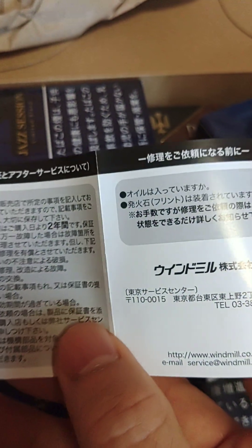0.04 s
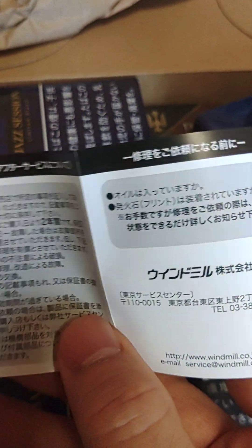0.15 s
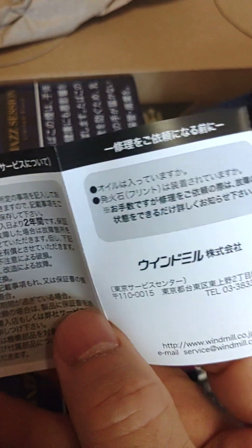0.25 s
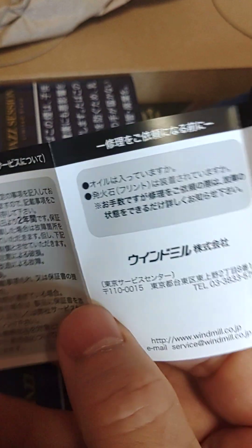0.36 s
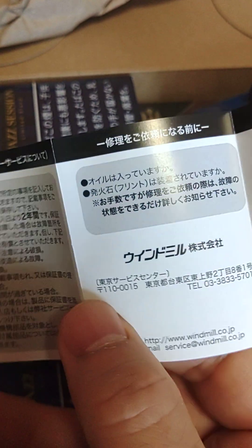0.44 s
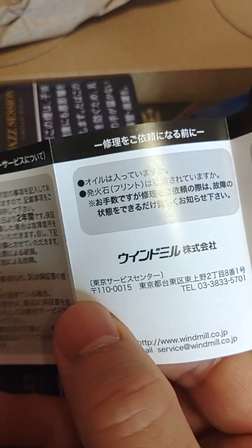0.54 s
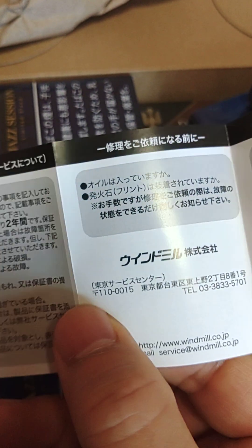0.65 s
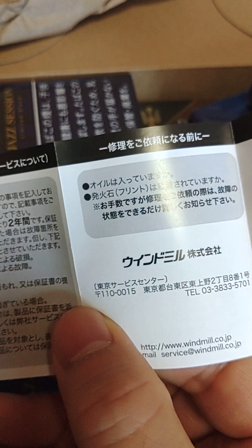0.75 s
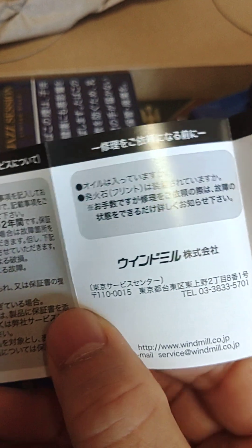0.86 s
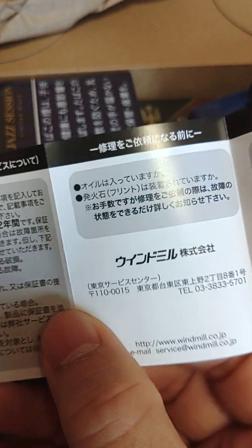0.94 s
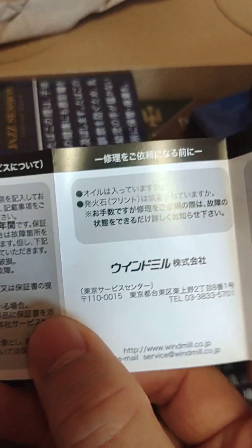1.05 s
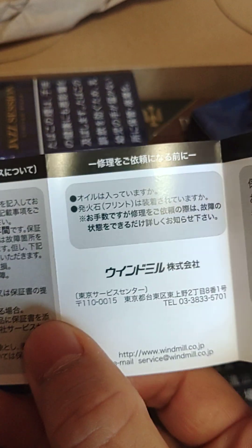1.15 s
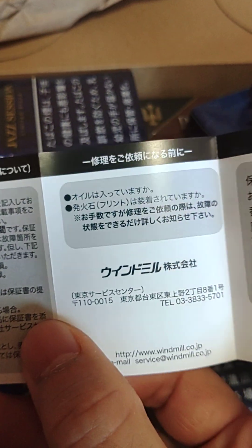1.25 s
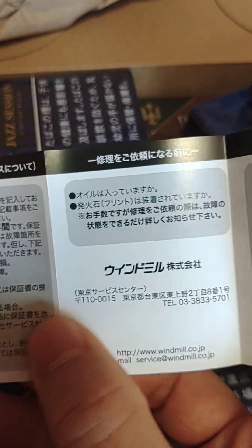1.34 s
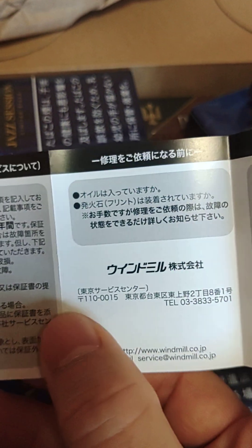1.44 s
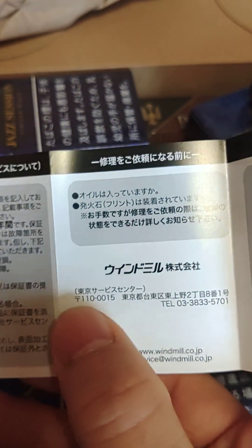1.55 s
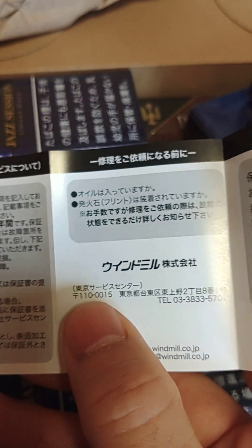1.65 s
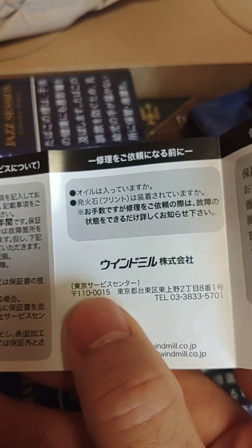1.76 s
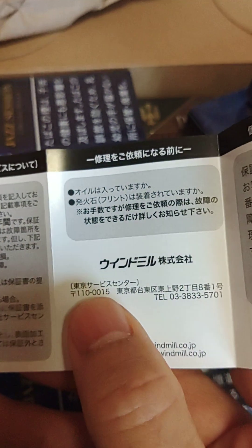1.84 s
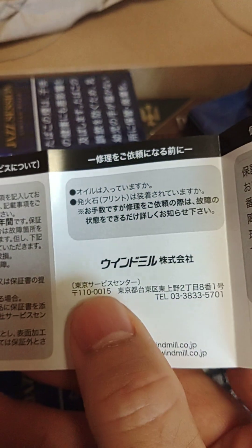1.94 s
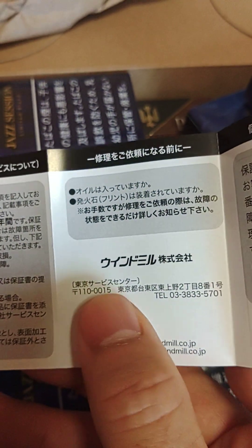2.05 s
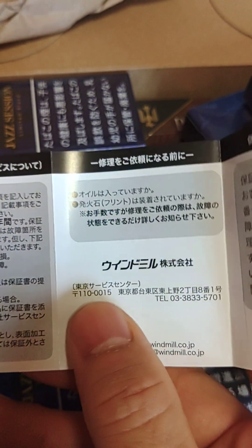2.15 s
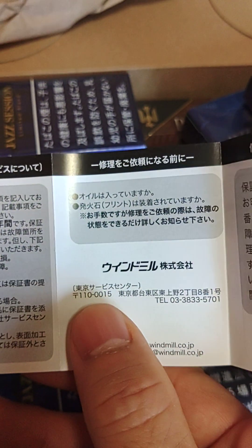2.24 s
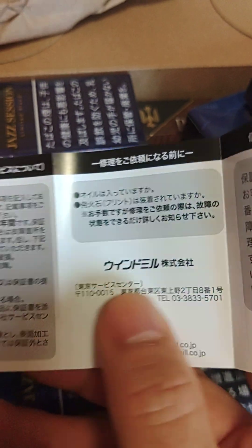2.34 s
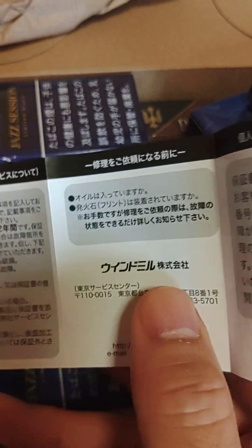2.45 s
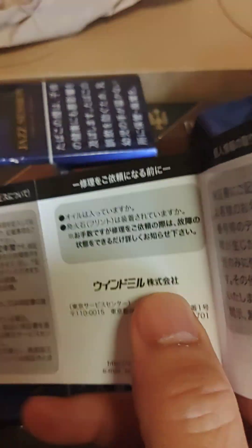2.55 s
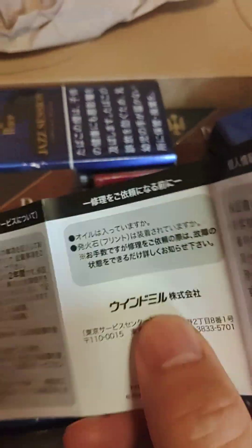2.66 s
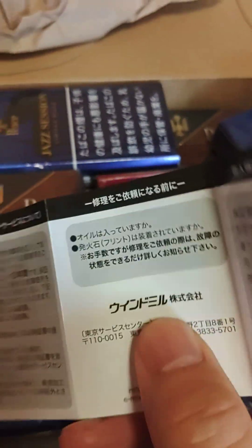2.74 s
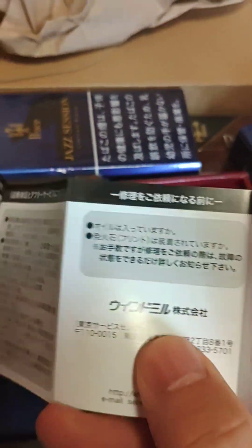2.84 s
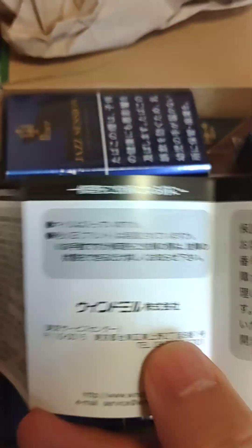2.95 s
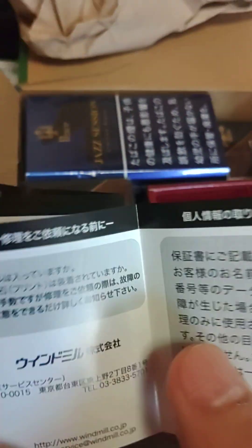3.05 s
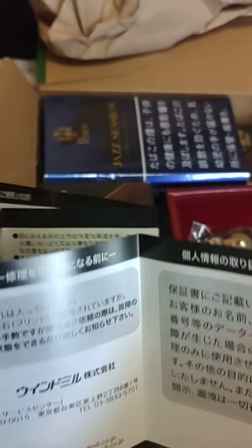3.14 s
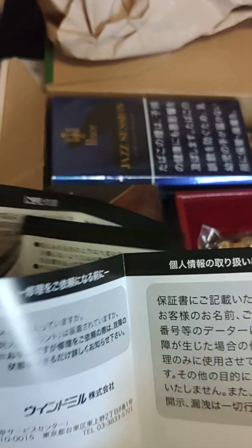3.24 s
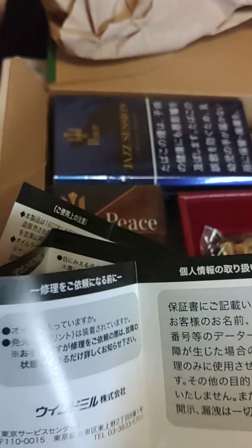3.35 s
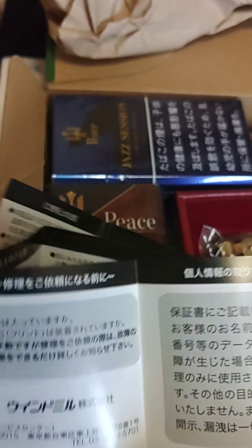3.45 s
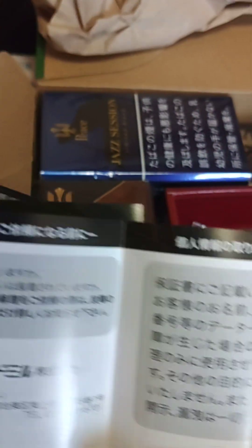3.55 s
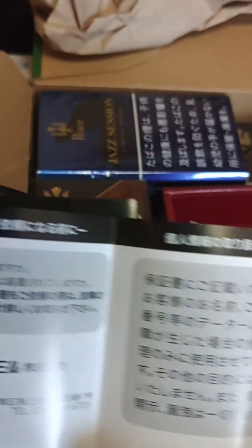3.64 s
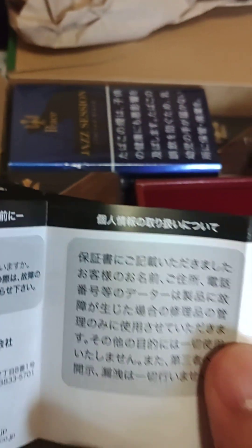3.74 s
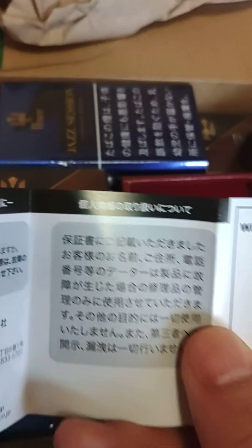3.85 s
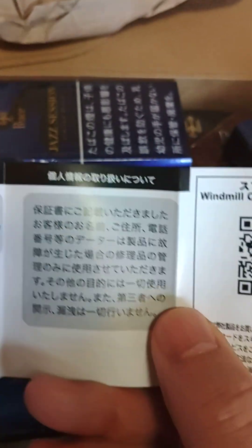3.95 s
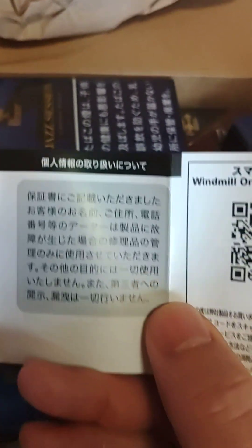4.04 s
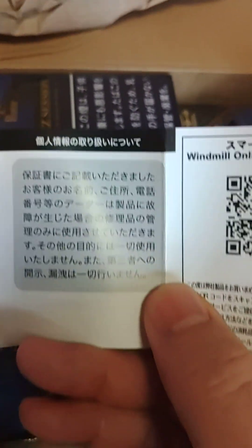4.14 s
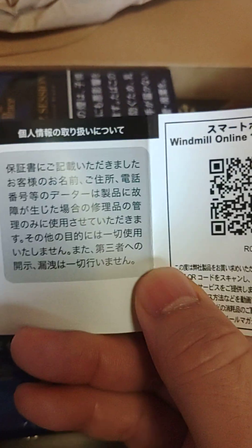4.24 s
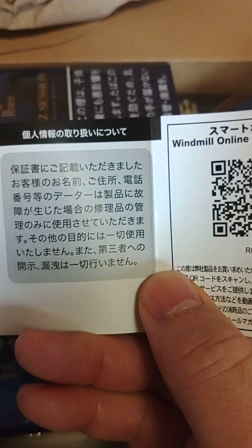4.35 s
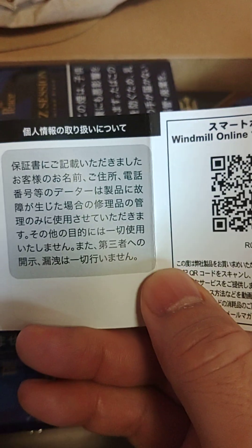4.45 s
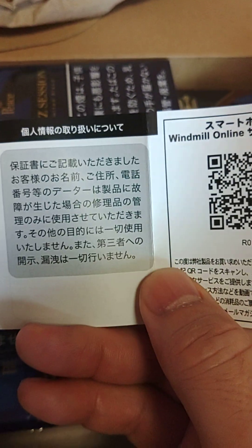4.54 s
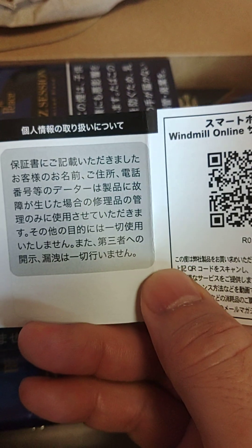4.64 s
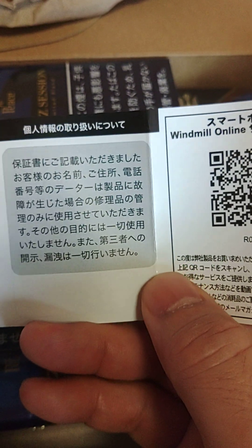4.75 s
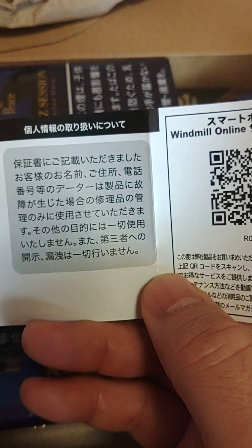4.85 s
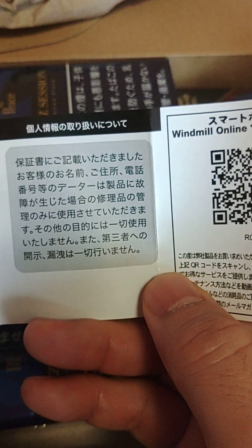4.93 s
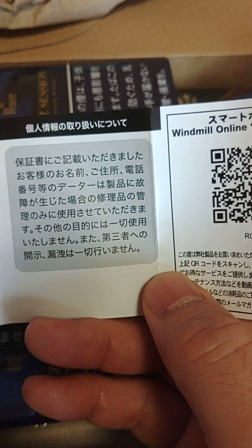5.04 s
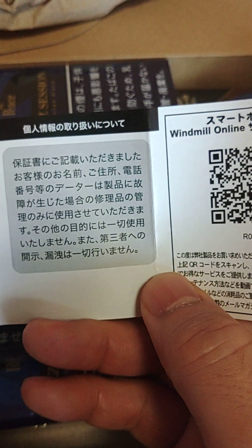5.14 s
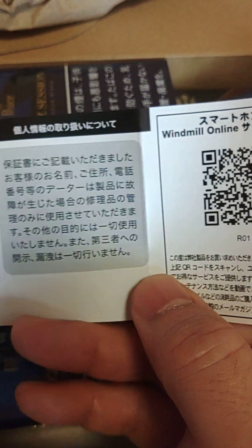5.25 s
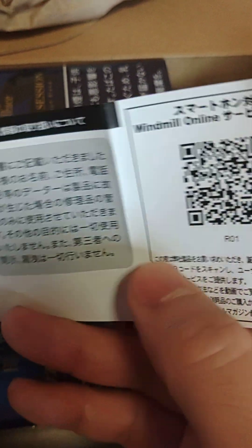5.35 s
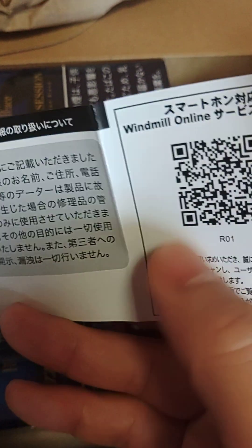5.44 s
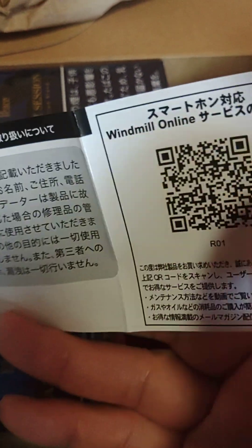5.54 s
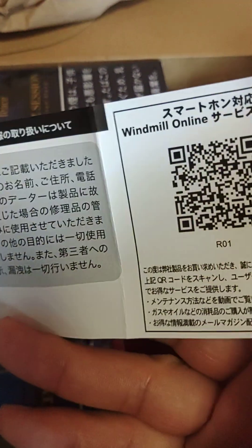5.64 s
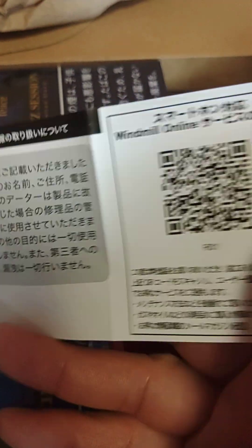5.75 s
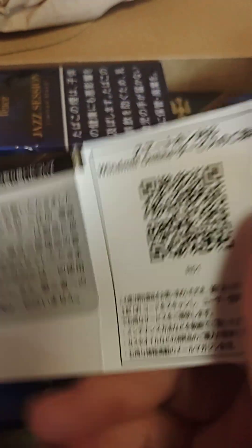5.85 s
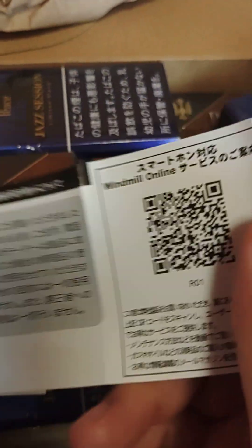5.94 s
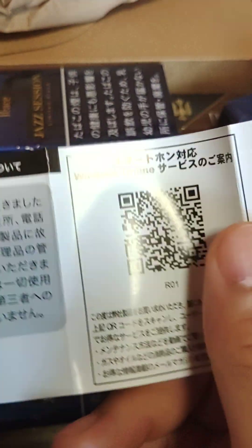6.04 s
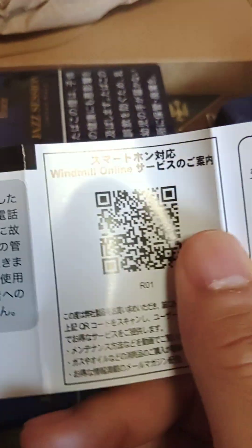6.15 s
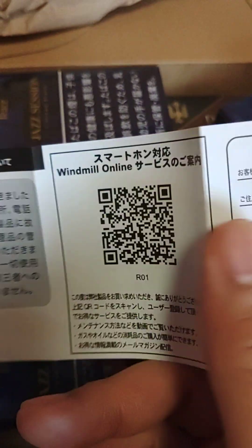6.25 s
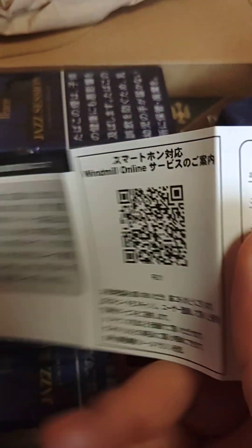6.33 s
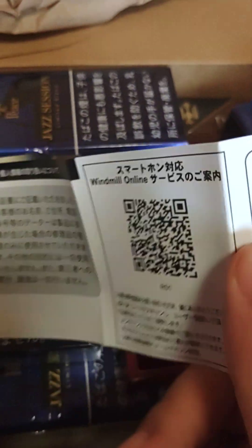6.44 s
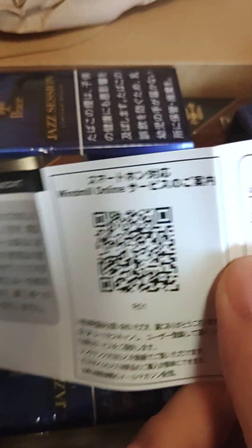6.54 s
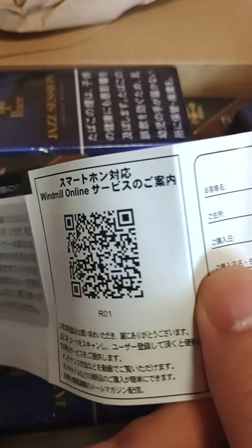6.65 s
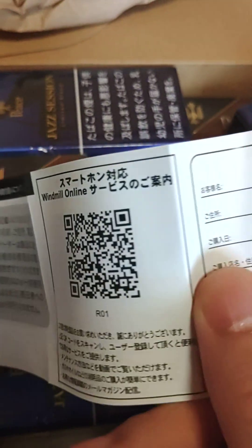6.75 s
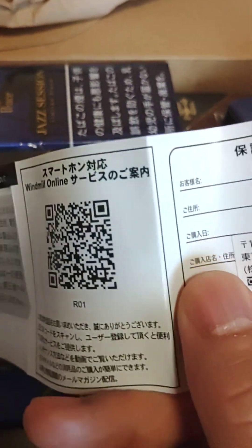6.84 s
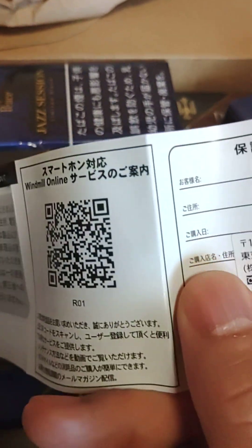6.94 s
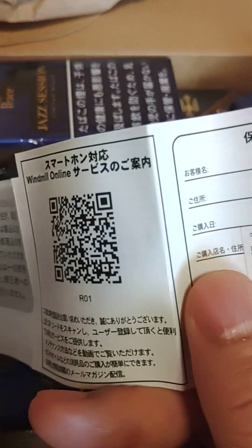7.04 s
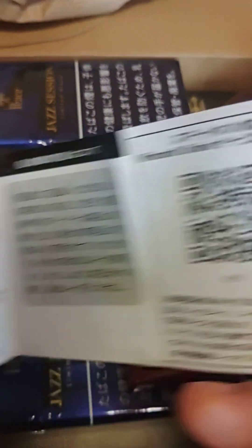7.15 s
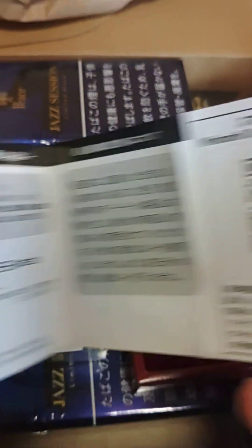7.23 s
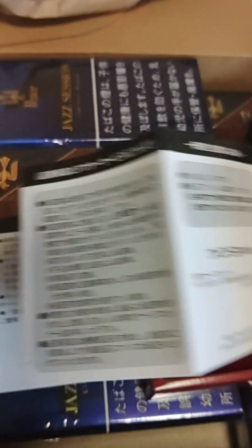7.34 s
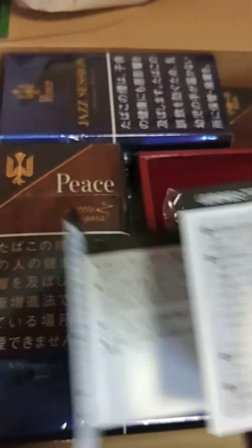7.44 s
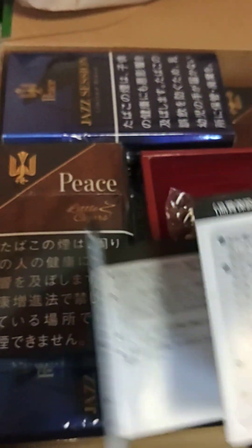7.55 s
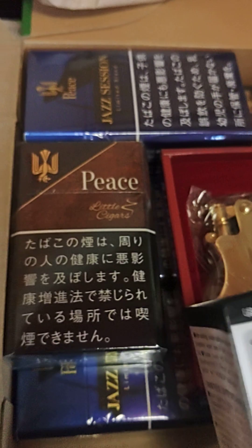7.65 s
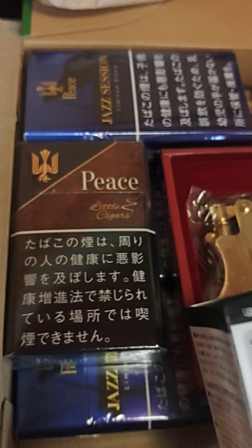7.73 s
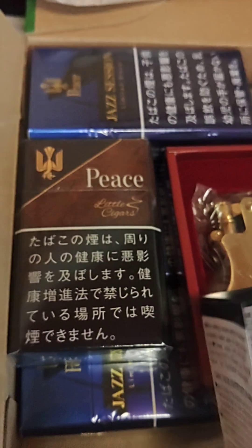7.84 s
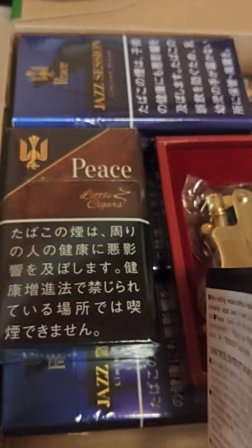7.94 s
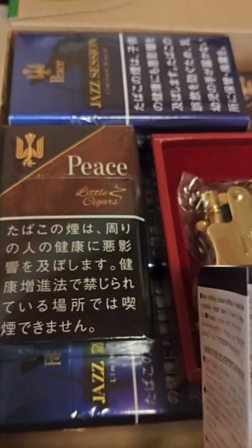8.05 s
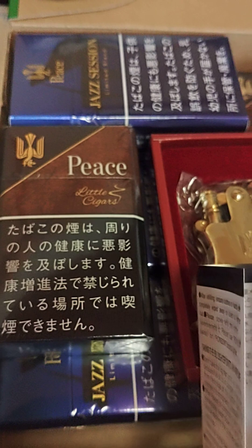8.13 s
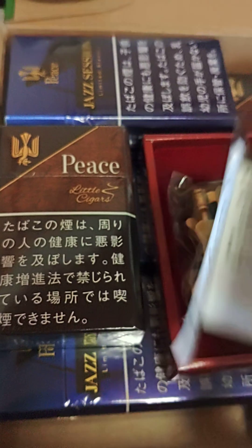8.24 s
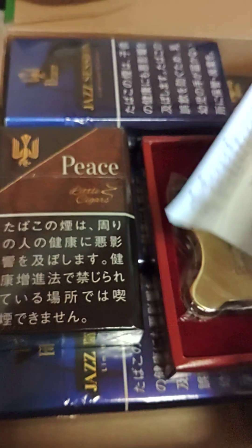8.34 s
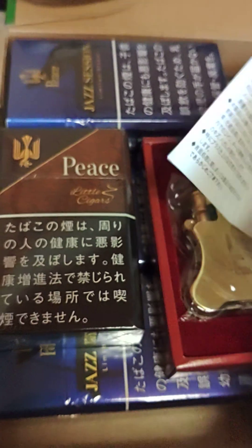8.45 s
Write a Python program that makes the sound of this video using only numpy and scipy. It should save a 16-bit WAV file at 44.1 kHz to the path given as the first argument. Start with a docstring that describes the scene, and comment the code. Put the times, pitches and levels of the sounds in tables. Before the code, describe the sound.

Very close, centred paper handling indoors: soft finger taps, brief dry crinkles, bright little snaps and papery sliding hiss, with a very short boxy tail. Activity comes in irregular bursts separated by quiet. A weak, wavering low hum, rumble and faint hiss swell and sink behind. After a middle lull the rustling returns and peaks in strong crackling near the end.

```python
"""Glossy leaflet unfolded by hand

A stiff, folded sheet is opened and turned close to a phone in a quiet room; both channels are alike.
Stick-slip noise, shaped by panel resonances, makes the crinkle, hiss and flexing of each push of the hand.
Creases snap and fingertips tap as noise bursts through ringing modes; skin squeaks as narrow-band noise.
A short decaying noise tail adds reflections from desk, box and walls.
Behind lie a wavering hum, rumble, faint hiss and treble ticks that swell and sink together."""
import sys
import numpy as np
from scipy import signal
from scipy.fft import rfft, irfft
from scipy.io import wavfile

SR = 44100
rng = np.random.default_rng(int(sys.argv[2]) if len(sys.argv) > 2 else 0)


def master_out(mix):
    """Clip the mix to full scale and print it as 16-bit PCM to the path in sys.argv[1]."""
    frames = np.transpose(np.atleast_2d(mix))
    ceiling = np.clip(frames, -1, 1)
    pcm = np.round(ceiling * 32767).astype(np.int16)
    wavfile.write(sys.argv[1], SR, pcm)


N = 374409
TIME = np.arange(N) / SR
FREQS = np.maximum(np.fft.rfftfreq(N, 1 / SR), 1)

# pushes of the hand that bend and slide the panels: (time of the height [s], rise [s], fall [s],
# crinkle level [dB], sliding hiss over crinkle [dB], low flexing over crinkle [dB])
HAND_PUSHES = [(0.278, 0.046, 0.12, -69.5, -3.5, -7), (0.446, 0.037, 0.028, -61.7, -3, -10),
               (1.078, 0.058, 0.03, -71, -2.5, -13), (1.402, 0.0084, 0.05, -70.5, -1.5, -8),
               (2.22, 0.068, 0.036, -77.0, 1.5, -4), (2.715, 0.086, 0.16, -60.5, -7, -2),
               (2.735, 0.011, 0.024, -48, -3.5, -7.3), (2.926, 0.039, 0.074, -69.5, -1, -7),
               (3.129, 0.12, 0.17, -76, 2, 2), (3.274, 0.03, 0.059, -66, 8, -0.5),
               (3.377, 0.14, 0.111, -67.5, 0.8, -8.5), (3.514, 0.078, 0.36, -72.5, 3.5, -3),
               (3.904, 0.031, 0.026, -56, -1.2, -11), (3.941, 0.042, 0.049, -53.5, -10, -1),
               (4.021, 0.019, 0.048, -48, -6, -3), (4.152, 0.13, 0.088, -64.9, -2.2, -6),
               (5.963, 0.12, 0.081, -68, -1.3, -3), (6.115, 0.045, 0.094, -72.5, 2.6, 2),
               (6.321, 0.038, 0.12, -66.5, 0, -2.5), (6.442, 0.069, 0.062, -64, -2.9, -0.5),
               (6.629, 0.083, 0.018, -58, 0.3, -11), (6.733, 0.128, 0.18, -72.5, -1.2, -4.5),
               (7.142, 0.058, 0.03, -61, -6.5, 0.7), (7.295, 0.06, 0.016, -67, -1.5, 1),
               (7.508, 0.075, 0.059, -74.5, 7, 13.5), (7.626, 0.094, 0.18, -58, -2.5, -1),
               (7.79, 0.033, 0.024, -54, -1.7, -16), (7.952, 0.012, 0.067, -61.5, 9.5, 1.5),
               (8.007, 0.043, 0.1, -60.5, 11, 4), (8.077, 0.022, 0.038, -43, -1.8, -4.9),
               (8.132, 0.039, 0.086, -45.5, -3, -2.5), (8.223, 0.035, 0.14, -53, 0, -7.5),
               (8.432, 0.12, 0.067, -55.5, 0, -6)]
# creases and edges letting go: (time [s], level [dB], brightness [Hz], length [ms],
# pitch of the panel's ring [Hz], thud of the whole sheet over the crack level [dB], ring [dB])
CREASE_SNAPS = [(0.277, -63.5, 1460, 5, 1250, 2, 11), (.7319, -63.5, 774, 5, 600, 3.5, 2),
                (1.3877, -69, 2100, 4, 2050, 2, 10), (1.4004, -65, 1460, 3.7, 1360, 6, 8),
                (1.4081, -49, 1550, 2.1, 1370, -7.5, 14), (2.647, -53.5, 2010, 3.5, 980, -8, 5),
                (2.6972, -48, 3650, 2.7, 3600, -11, -2), (2.7322, -36.5, 5460, 1.4, 2080, -13.5, 9),
                (2.7727, -55, 1300, 5.9, 1170, -2, -1), (2.918, -43.5, 2570, 2.4, 985, -7.5, 12),
                (3.4157, -52.5, 2640, 1.4, 2050, -9.5, 2), (3.466, -56.5, 7400, 1.9, 7800, -4.5, 6),
                (3.8562, -58.5, 1550, 2.5, 1470, -6, 15), (3.8854, -62, 1350, 4.4, 1980, -14, 3),
                (3.9049, -49.5, 4500, 2.1, 4600, -9, 11), (4.0213, -38, 3900, 5.4, 1370, -8, 5.5),
                (4.153, -64, 2070, 3.5, 2200, -3, 1), (5.6722, -59.5, 1970, 0.51, 1160, -1.5, 11),
                (6.0817, -65, 4800, 1.6, 4780, -12, 9), (6.1637, -56.5, 3000, 3, 1050, -7.5, 13),
                (6.3154, -51.3, 2300, 1.2, 1230, -11, 6), (6.4408, -54, 1700, 5.4, 1230, -1.5, 12),
                (6.4596, -59.5, 2100, 2.5, 2020, -11, 12), (6.537, -53, 2500, 1.4, 1360, -5.5, 13),
                (6.762, -66, 1460, 2, 1160, -15, 11), (6.795, -62, 1370, 1.1, 1340, -1, 9),
                (7.1306, -43, 2900, 2.6, 2130, -9.5, 13.5), (7.2895, -54, 1120, 3, 980, -2, 12),
                (7.4985, -48, 2300, 0.79, 1430, -7, 5), (7.564, -53.5, 4900, 3.8, 7280, -21, 8),
                (7.62, -42, 3500, 1.1, 4000, -8.5, 4), (7.9406, -59.5, 9000, 1.8, 6300, -2, 9),
                (7.9917, -47, 2500, 4.9, 1270, -7, 4), (8.059, -46, 1350, 3, 2110, 3, 8),
                (8.07, -34, 2980, 4.8, 1860, -7, 4), (8.1269, -30.5, 3120, 3.7, 1260, -10.5, 4.5),
                (8.375, -46, 3520, 7.6, 3450, -6, 1), (8.417, -48, 4400, 5.5, 3720, -21, 9)]
# fingertips landing softly on a taut panel: (time [s], level [dB], pitch [Hz])
FINGER_TAPS = [(.617, -71.5, 950), (1.183, -73, 890), (1.756, -76.5, 915), (2.399, -72, 930),
               (5.866, -63.5, 1290), (5.9049, -60, 1140), (6.0, -62, 900), (6.741, -64.5, 950),
               (6.8723, -67.5, 1160), (7.102, -62.5, 980)]
# skin squeaking on the gloss: (time [s], level [dB], pitch [Hz])
SKIN_SQUEAKS = [(.4435, -64, 8270), (5.519, -73.5, 4530)]
# swells of the soft background noise: (start [s], end [s], level [dB])
BACKGROUND_SWELLS = [(0.022, 0.754, 2.5), (0.868, 1.44, -1.9), (1.558, 1.6, 1.7), (1.927, 1.988, -9.5),
                     (2.138, 2.293, 0), (2.441, 2.457, 0), (2.597, 4.604, 2), (4.815, 4.826, -4.5),
                     (5.031, 5.14, -0.5), (5.246, 5.36, 2), (5.498, 6.883, 2), (7.003, 8.49, 5.6)]
# resonances of the panels and the space under them: (frequency [Hz], width [Hz], level [dB])
PANEL_MODES = [(315, 190, 0.5), (1040, 460, 6.5), (1350, 190, 3.5), (2013, 330, 5.5), (3130, 760, 4),
               (4740, 1300, 3), (7420, 1600, 11)]
# pitches at which small patches of the sheet buckle: (frequency [Hz], level [dB])
BUCKLING_PATCHES = [(720, -7.5), (950, 0), (1200, 0.5), (1500, -0.5), (2000, 5), (2500, -3), (3200, -2.5),
                    (4200, -0.5)]
# spectrum of bent panels rubbing: (frequency [Hz], density [dB per Hz])
CRINKLE_SPECTRUM = [(250, -14.5), (600, -9.5), (1100, -4.5), (2200, -4.5), (4500, -3), (5800, -11),
                    (9000, -23), (15000, -53)]
# spectrum of glossy faces sliding: (frequency [Hz], density [dB per Hz])
SLIP_SPECTRUM = [(2000, -20), (4500, -6), (6500, -0.5), (9000, -2), (11000, -3.5), (12500, -2.5),
                 (13600, 0.5), (14600, -2.5), (15700, -17)]
# spectrum of flat faces gliding without bending: (frequency [Hz], density [dB per Hz])
SHEEN_SPECTRUM = [(9000, -25.5), (11500, -12.5), (12500, -5.5), (13600, 1), (14500, -7), (15700, -18.5)]
# spectrum of the whole sheet flexing: (frequency [Hz], density [dB per Hz])
FLEX_SPECTRUM = [(40, -11.5), (90, 2.5), (170, 3), (300, 0), (450, 0), (700, -12.5), (1500, -31)]
# spectrum of a panel's crack as a crease lets go: (frequency [Hz], density [dB per Hz])
SNAP_SPECTRUM = [(50, -33), (150, -15), (400, -5), (680, -3.5), (1000, -3), (2500, -1.5), (4500, 4.5),
                 (5800, -4), (9000, -2.5), (15000, 8.5)]
# spectrum of the whole sheet thudding: (frequency [Hz], density [dB per Hz])
THUD_SPECTRUM = [(50, -15), (110, 2), (170, -4.5), (260, -2), (420, 3), (600, 2), (900, -11.5), (2500, -55)]
# spectrum of the low rumble and of the air pushed by the hands: (frequency [Hz], density [dB per Hz])
RUMBLE_SPECTRUM = [(5, 1.5), (14, 7.5), (22, -1), (35, -7.5), (55, -8), (80, -18.5), (120, -22.5),
                   (200, -44.5), (500, -64.5)]
# spectrum of the faint steady hiss: (frequency [Hz], density [dB per Hz])
HISS_SPECTRUM = [(60, 13), (130, 18.5), (250, 8.5), (500, 6.5), (1100, 6), (2500, 0), (6000, -2.5),
                 (11000, -0.5), (13500, 1), (15700, -0.5)]

PUSH_DROP_DB, PUSH_CURVE = 11.5, 1.41  # loss one rise or fall time from the height; roundness
# paper creeping in the grip between pushes, before the swells are added
RESTING_CRINKLE_DB, RESTING_HISS_DB, RESTING_FLEX_DB = -83.5, -83.5, -84.5
TAP_BRIGHT_HZ, TAP_MS, TAP_RING_DB, TAP_THUD_DB = 1244, 2.4, 14, -6
FULL_CRACKLES_PER_S, CRACKLE_DB, CRACKLE_TOP_HZ = 130, -10.5, 2610  # level is relative to the crinkle
CRACKLE_ONSET_DB, CRACKLE_RANGE_DB = -82, 13  # crinkle level and span over which the rate grows
SQUEAK_S, SQUEAK_Q = 0.015, 12
SWELL_RISE_DB_PER_S, SWELL_SINK_DB_PER_S, LULL_DB = 460, 69.5, -19
HUM_HZ, HUM_DB = 60, -64  # level before the swells are added
TOP_HZ = 15700


def paper_db():
    """Power addition: pushes join the resting grip in the levels of crinkle, hiss and flexing."""
    resting_db = np.array([[RESTING_CRINKLE_DB], [RESTING_HISS_DB], [RESTING_FLEX_DB]])
    power = undb(resting_db + swell_db()) ** 2
    for s, rise, fall, db, hiss_db, flex_db in HAND_PUSHES:
        away = np.maximum((s - TIME) / rise, (TIME - s) / fall)
        near = away < 5
        shape_db = db - PUSH_DROP_DB * away[near] ** PUSH_CURVE
        offsets_db = np.array([[0], [hiss_db], [flex_db]])
        power[:, near] += undb(offsets_db + shape_db) ** 2
    return 10 * np.log10(power)


def rustle(crinkle_db, slip_db, flex_db):
    """Stick-slip friction and bending: panels crinkle, glossy faces hiss and the whole sheet flexes."""
    grip = walk(60)  # the fingers catch and let go
    grains = slips(rate=7000, spread_db=0.1) + 1.75 * rng.standard_normal(N)
    rub = colour(grains, spectrum(CRINKLE_SPECTRUM) + panel_db())

    # a light touch mostly rubs; patches buckle more once the sheet is worked harder
    share = np.interp(crinkle_db, [-80, -66], [.15, .5])
    crinkle = np.sqrt(1 - share) * rub + np.sqrt(share) * buckles()
    crinkle = crinkle * undb(crinkle_db + 2.2 * grip - 0.8)

    slip = colour(slips(rate=13000, spread_db=0.0), spectrum(SLIP_SPECTRUM))
    slip = slip * undb(slip_db + 0.64 * grip + 2.0 * walk(90))

    # flat faces gliding without bending add a very high sheen
    sheen_db = slip_db + 0.61 * np.clip(slip_db - crinkle_db, -6, 11) - 3.5
    sheen = colour(slips(rate=14000, spread_db=1.0), spectrum(SHEEN_SPECTRUM))
    sheen = sheen * undb(sheen_db + 3.1 * walk(70))

    flex = colour(slips(rate=1500, spread_db=1.0), spectrum(FLEX_SPECTRUM) + panel_db())
    flex = flex * undb(flex_db + 2.9 * walk(30) - 0.55)
    return crinkle + slip + sheen + flex


def buckles():
    """Snap-through buckling: small patches flip on their own, each a short knock of a few cycles."""
    knocks = 0
    for hz, db in BUCKLING_PATCHES:
        flips = slips(rate=80, spread_db=4.0, top_db=10.5)
        knock = resonance(resonance(flips, hz, q=3.7), hz, q=3.7)
        knocks = knocks + undb(db) * unit(knock)
    return unit(knocks)


def snaps(size=4096):
    """Impulsive excitation: a release and a fast run of smaller ones ring a panel at its own pitch."""
    out, t = np.zeros(N + size), np.arange(size) / SR
    panel = response(spectrum(SNAP_SPECTRUM) + panel_db())
    sheet = response(spectrum(THUD_SPECTRUM))
    taps = [(s, db, TAP_BRIGHT_HZ, TAP_MS, hz, TAP_THUD_DB, TAP_RING_DB) for s, db, hz in FINGER_TAPS]
    blows = CREASE_SNAPS + taps
    runs = rng.standard_normal((len(blows), size))
    for (s, db, bright_hz, length_ms, ring_hz, thud_db, ring_db), run in zip(blows, runs):
        age = t / (length_ms / 1000)
        force = run * ((1 + age) * np.exp(-age * 1.25) + .15 * np.exp(-age / 5.7))
        force[0] += 5.0 / length_ms  # the shortest snaps are nearly a single release
        soft = signal.butter(2, min(bright_hz, SR / 2.5), fs=SR, output="sos")
        crack = signal.sosfilt(soft, signal.fftconvolve(force, panel)[:size])
        crack = crack + (undb(ring_db) - 1) * resonance(crack, ring_hz, q=4.9)
        thud = signal.fftconvolve(force, sheet)[:size]
        start = int(s * SR)
        out[start:start + size] += spread_level(crack, db) + spread_level(thud, db + thud_db)
    return out[:N]


def crackles(crinkle_db, limit_db=-52):
    """Random failure: small creases give way more often and, up to a limit, louder under harder work."""
    effort = np.clip((crinkle_db - CRACKLE_ONSET_DB) / CRACKLE_RANGE_DB, .1, 1)
    clicks = slips(rate=FULL_CRACKLES_PER_S, spread_db=0.5, top_db=8)
    clicks = clicks * (rng.random(N) < effort)
    dull_db = -10 * np.log10(1 + (FREQS / CRACKLE_TOP_HZ) ** 4)
    coloured = colour(clicks, spectrum(SNAP_SPECTRUM) + panel_db() + dull_db)
    return coloured * undb(np.minimum(crinkle_db, limit_db) + CRACKLE_DB)


def squeaks():
    """Friction exciting a resonance: a fingertip skids for a moment with a narrow, bright chirp."""
    out = 0
    for s, db, hz in SKIN_SQUEAKS:
        skid = resonance(rng.standard_normal(N), hz, q=SQUEAK_Q)
        skid = unit(resonance(skid, hz, q=SQUEAK_Q))
        out = out + skid * undb(db) * np.exp(-((TIME - s) / SQUEAK_S) ** 2)
    return out


def reflections(x, t60=.12, wet_db=-12, gap_s=0.0037, size=16384):
    """Exponential decay of reflected energy: desk, box and walls return a short, dense tail."""
    t = np.arange(size) / SR
    tail = rng.standard_normal(size) * (t > gap_s) * np.exp(-np.log(1000) * t / t60)
    tail = tail / np.linalg.norm(tail)
    return x + undb(wet_db) * signal.oaconvolve(x, tail)[:N]


def handling(flex_db):
    """Air displacement: the moving hands and sheet push air at the microphone, a low rumble."""
    air = colour(rng.standard_normal(N), spectrum(RUMBLE_SPECTRUM), size=32768)
    return air * undb(0.46 * flex_db - 22)


def ticks(level_db):
    """Impulses through a damped mode: a few faint, very short treble ticks each second."""
    clicks = (rng.random(N) < 6.5 / SR) * rng.uniform(0.34, 1, N)
    return resonance(clicks, 10000, q=2.4) * undb(level_db * 0.97 - 44.5)


def swell_db():
    """Envelope in decibels: each background swell rises fast, holds, and sinks slowly toward a lull."""
    db = LULL_DB
    for start, end, top_db in BACKGROUND_SWELLS:
        before_db = SWELL_RISE_DB_PER_S * np.maximum(start - TIME, 0)
        after_db = SWELL_SINK_DB_PER_S * np.maximum(TIME - end, 0)
        db = np.maximum(db, top_db - (before_db + after_db))
    return db


def background(level_db):
    """Tone plus filtered noise: a wavering hum, low rumble and smooth hiss share one envelope."""
    phase = 2 * np.pi * np.cumsum(HUM_HZ + .15 * walk(3)) / SR
    tone = np.sqrt(2) * (np.sin(phase) + undb(-25.5) * np.sin(3 * phase))
    hum = tone * undb(HUM_DB + 1.0 * walk(2.5))
    rumble = colour(rng.standard_normal(N), spectrum(RUMBLE_SPECTRUM), size=32768) * undb(-60)
    hiss = colour(rng.standard_normal(N), spectrum(HISS_SPECTRUM)) * undb(-77.0)
    return (hum + rumble + hiss) * undb(level_db)


def slips(rate, spread_db, top_db=20):
    """Stick-slip: tiny releases at random moments, a wider spread giving a few large ones; rms 1."""
    sizes = undb(np.minimum(spread_db * rng.exponential(size=N), top_db))
    moments = rng.random(N) < rate / SR
    return unit(moments * sizes * rng.standard_normal(N))


def walk(rate):
    """Random modulation: straight lines join normal random knots, rate of them per second."""
    knots = rng.standard_normal(4096)
    return np.interp(TIME * rate, np.arange(len(knots)), knots)


def resonance(x, hz, q):
    """Damped oscillation: one mode with gain 1 at its centre."""
    b, a = signal.iirpeak(min(hz, SR / 2.5), q, fs=SR)
    return signal.lfilter(b, a, x)


def panel_db():
    """Modal resonance: the peaks that the panels add to a spectrum, in dB."""
    return sum(db / (1 + (2 * (FREQS - hz) / width) ** 2) for hz, width, db in PANEL_MODES)


def spectrum(points):
    """Logarithmic frequency scale: a dB value for every frequency, from a few points."""
    hz, db = np.transpose(points)
    return np.interp(np.log(FREQS), np.log(hz), db)


def response(db, size=4096):
    """Minimum phase: the folded cepstrum gives a causal impulse response of unit energy."""
    log_gain = np.interp(np.fft.rfftfreq(size, 1 / SR), FREQS, np.log(undb(db)))
    cepstrum = irfft(log_gain)
    cepstrum[1:size // 2] *= 2
    cepstrum[size // 2 + 1:] = 0
    h = irfft(np.exp(rfft(cepstrum)))
    return h / np.linalg.norm(h)


def colour(x, db, size=4096):
    """Linear filtering: convolve x with the response of a dB spectrum; rms 1."""
    return unit(signal.oaconvolve(x, response(db, size=size))[:N])


def spread_level(x, db):
    """Energy equivalence: a short sound's energy, spread over 5 ms, has this level."""
    return undb(db) * x * np.sqrt(SR / 200 / np.sum(x ** 2))


def undb(db):
    """Logarithmic level: decibels to amplitude gain."""
    return 10 ** (np.asarray(db) / 20)


def unit(x):
    """Mean-square power: scale to rms 1."""
    return x / np.sqrt(np.mean(x ** 2))


def scene():
    """Superposition: paper close by with its reflections, the room behind it."""
    crinkle_db, slip_db, flex_db = paper_db()
    level_db = swell_db()
    paper = rustle(crinkle_db, slip_db, flex_db) + snaps() + crackles(crinkle_db) + squeaks()
    mono = reflections(paper) + ticks(level_db) + background(level_db) + handling(flex_db)
    return np.array([mono, mono])


def record(dry):
    """Band limiting: the phone cuts the top with a steep low-pass filter."""
    low_pass = signal.ellip(10, .2, 70, TOP_HZ, fs=SR, output="sos")
    return signal.sosfilt(low_pass, dry)


dry = scene()
out = record(dry)
master_out(out)
```